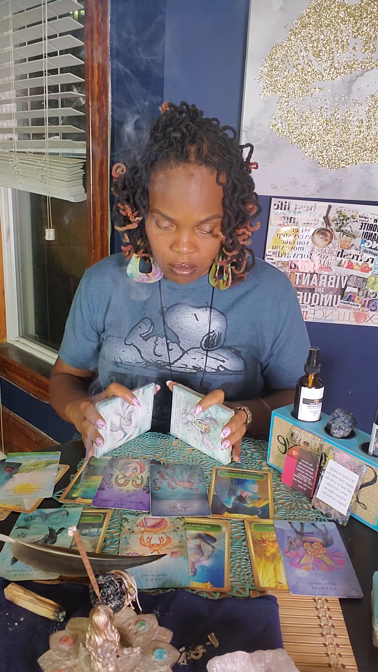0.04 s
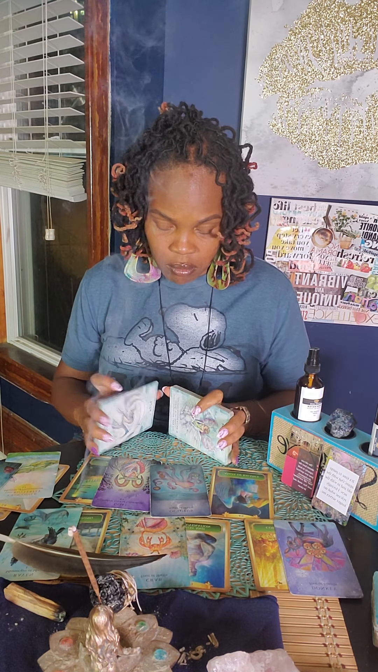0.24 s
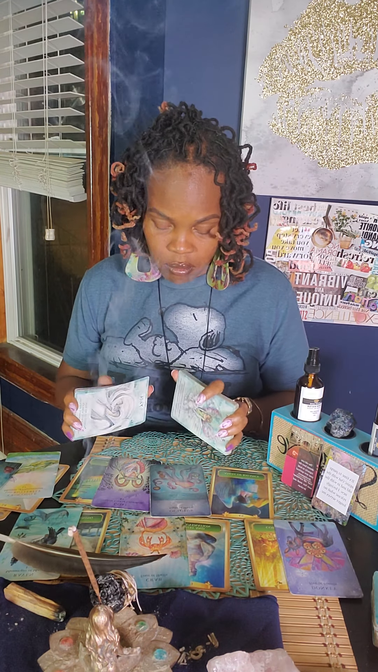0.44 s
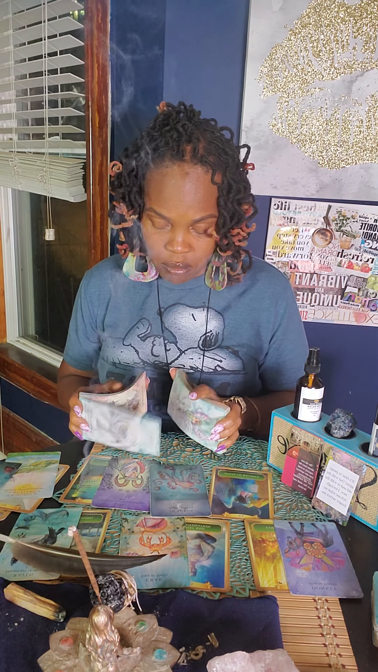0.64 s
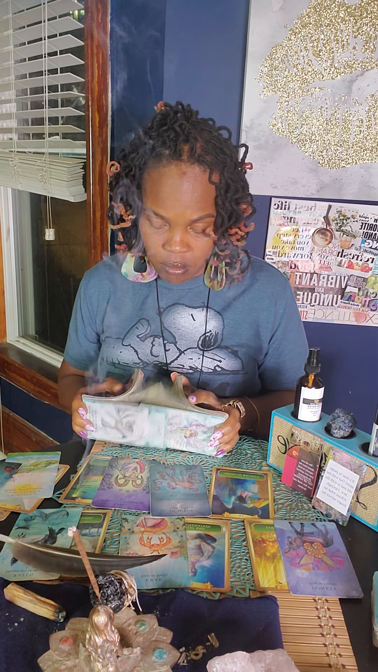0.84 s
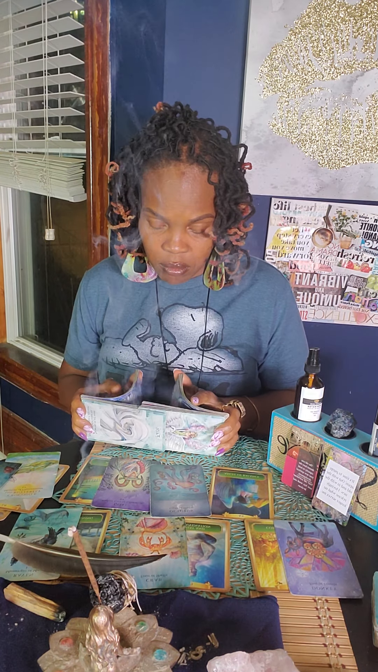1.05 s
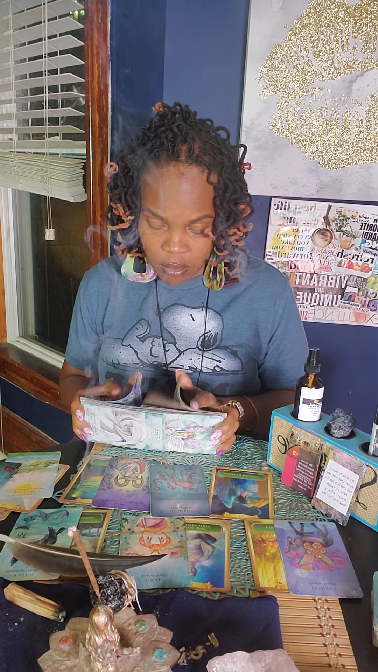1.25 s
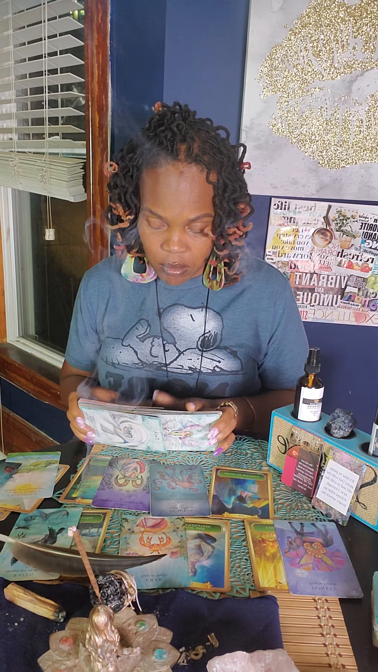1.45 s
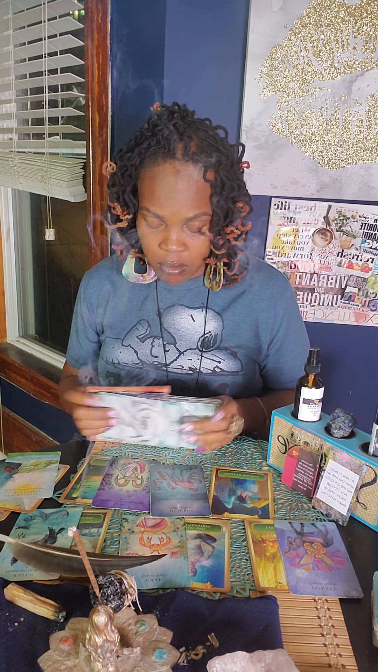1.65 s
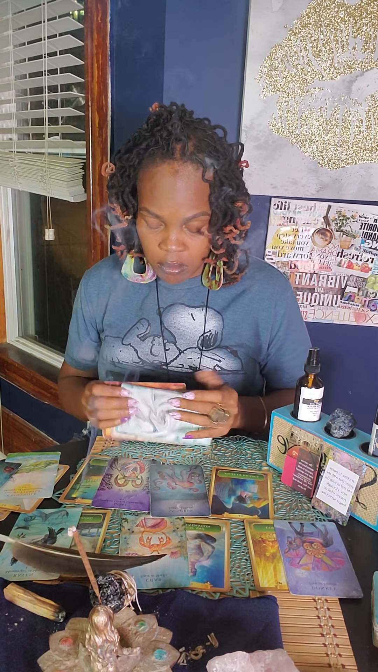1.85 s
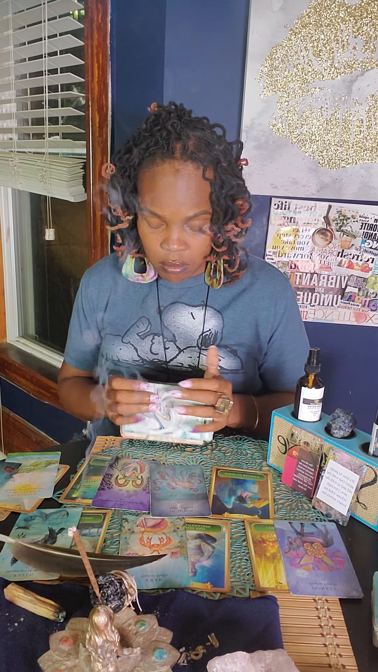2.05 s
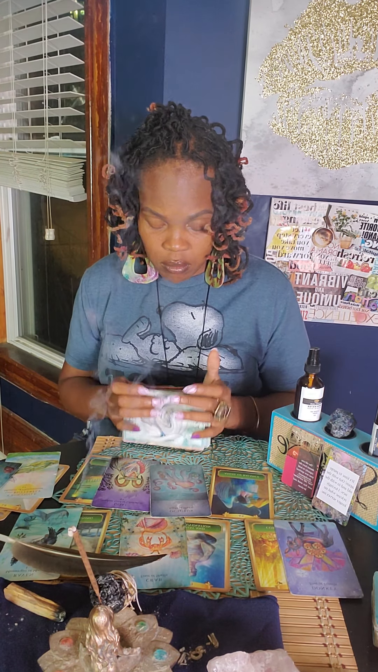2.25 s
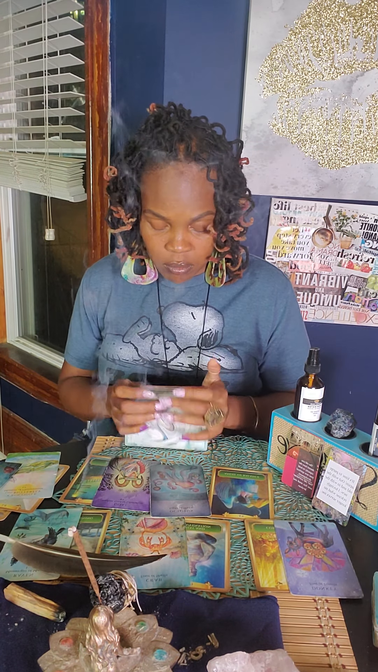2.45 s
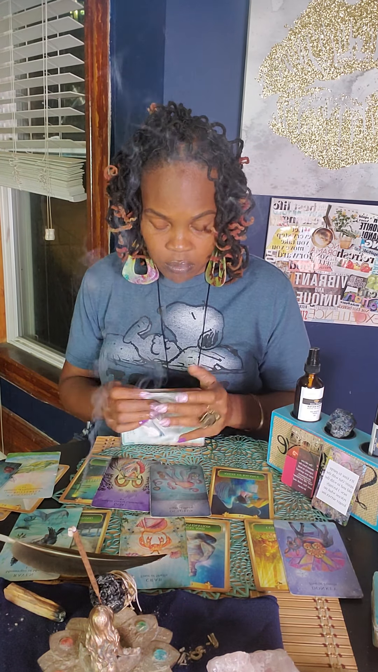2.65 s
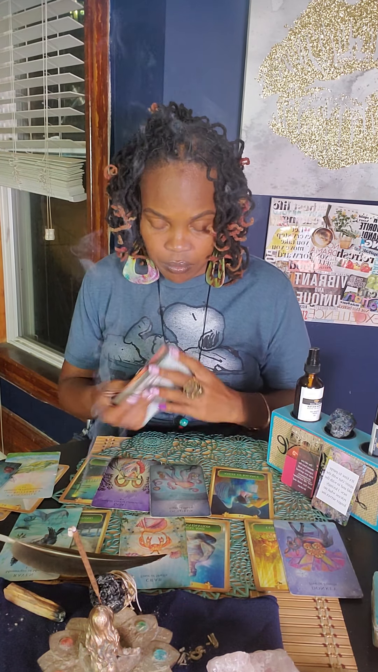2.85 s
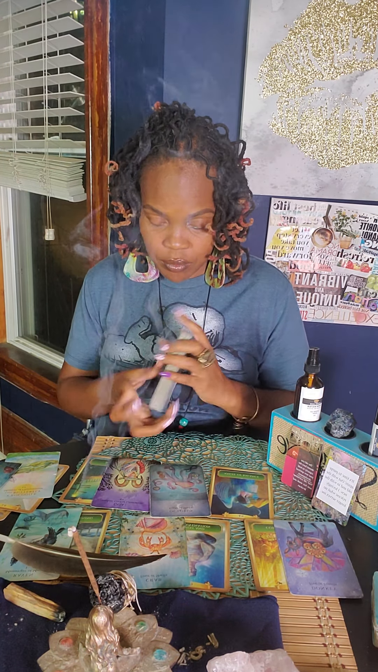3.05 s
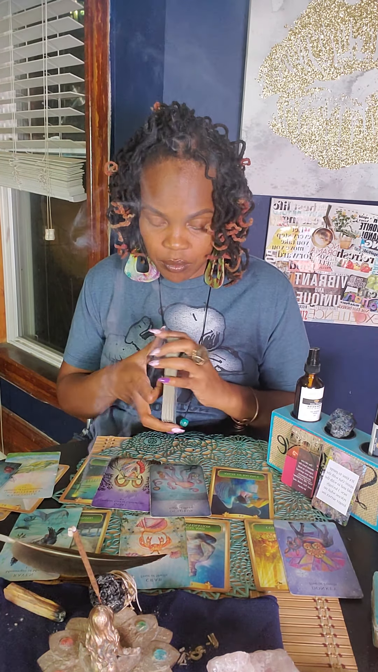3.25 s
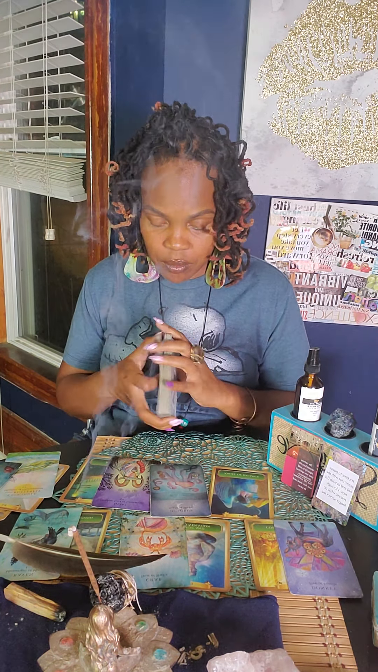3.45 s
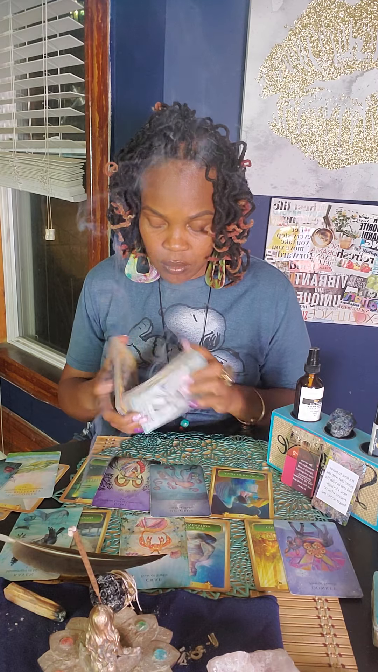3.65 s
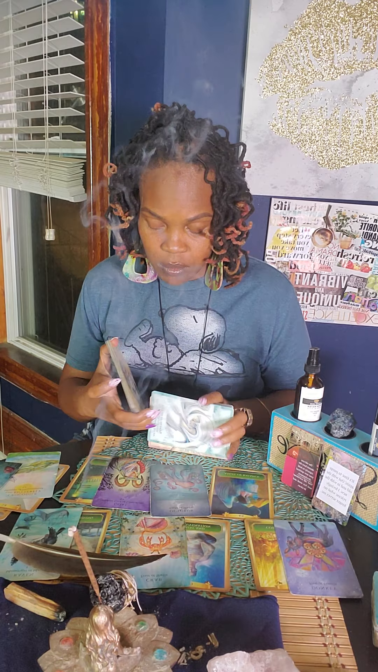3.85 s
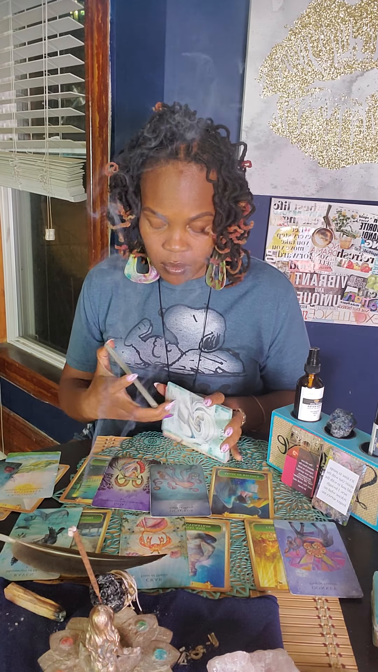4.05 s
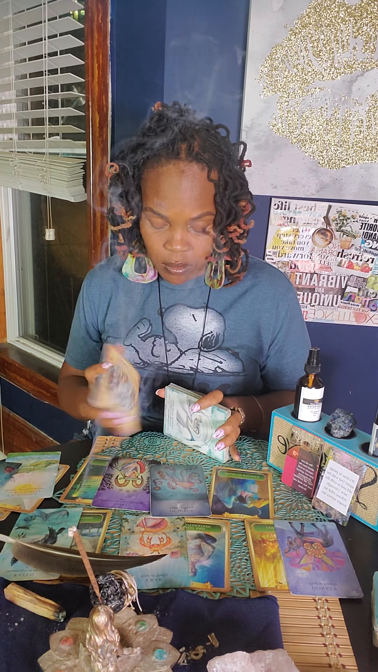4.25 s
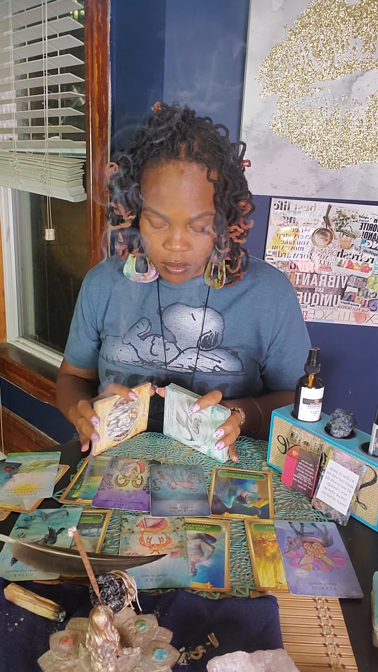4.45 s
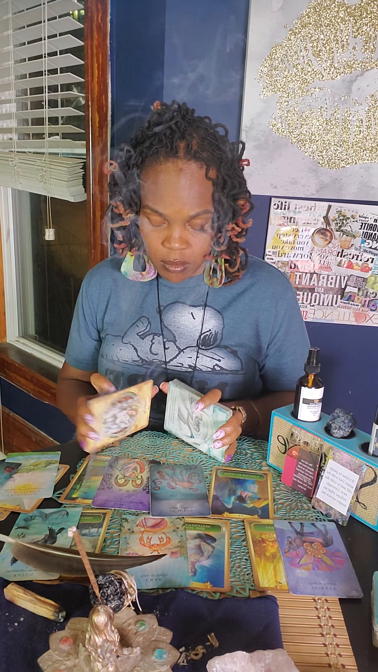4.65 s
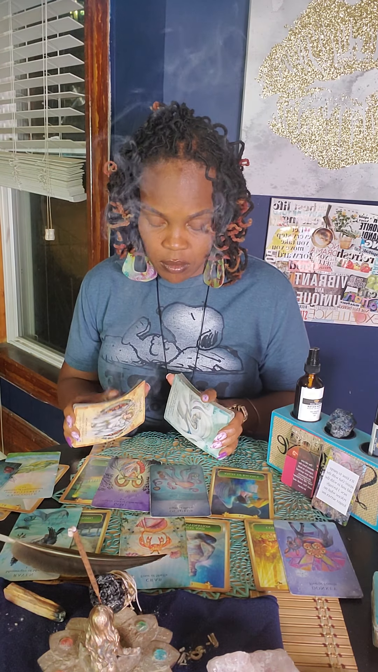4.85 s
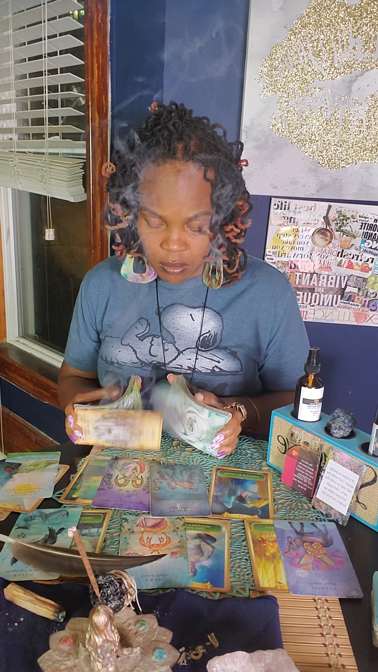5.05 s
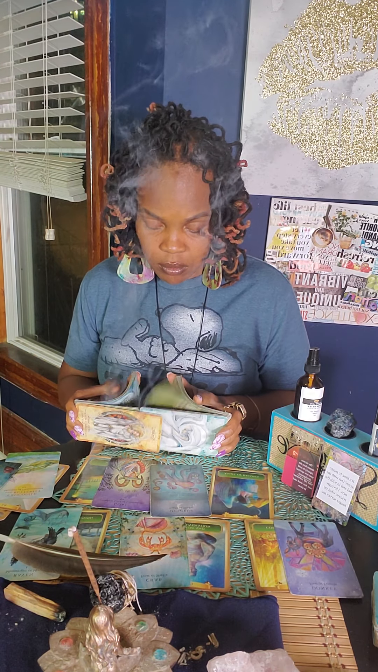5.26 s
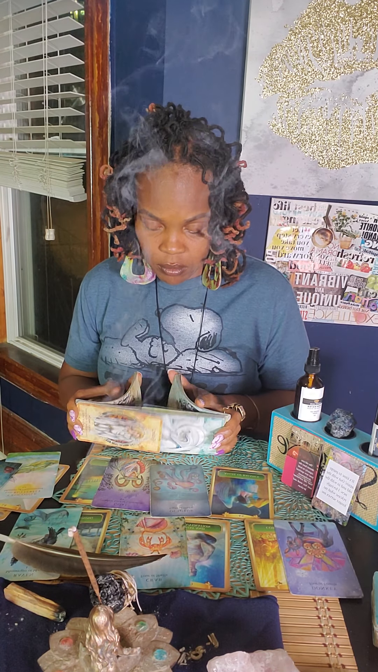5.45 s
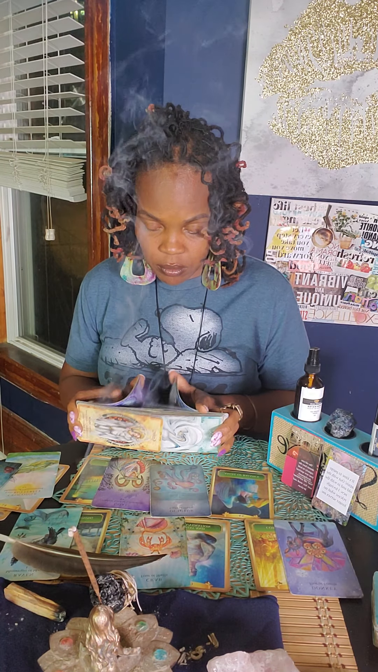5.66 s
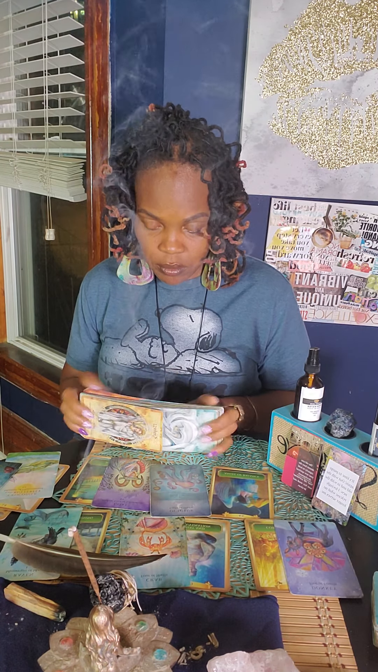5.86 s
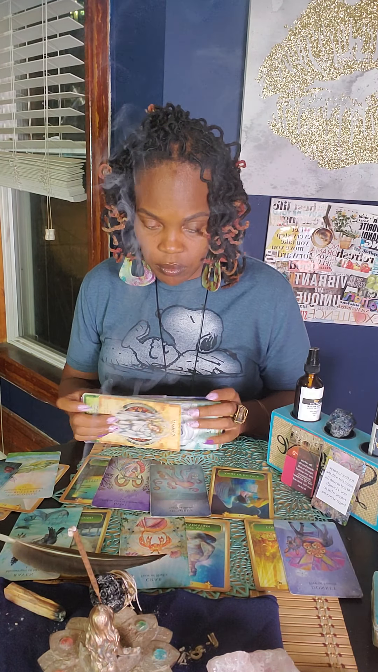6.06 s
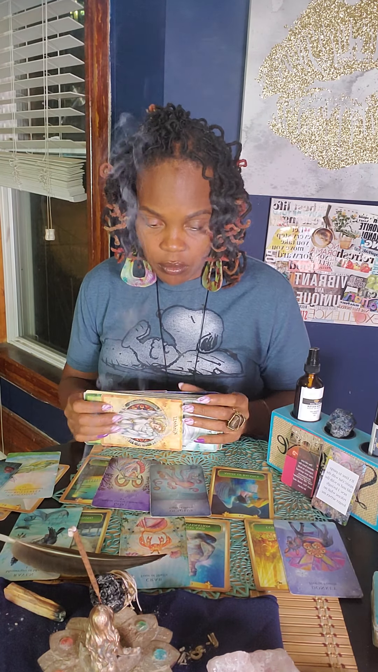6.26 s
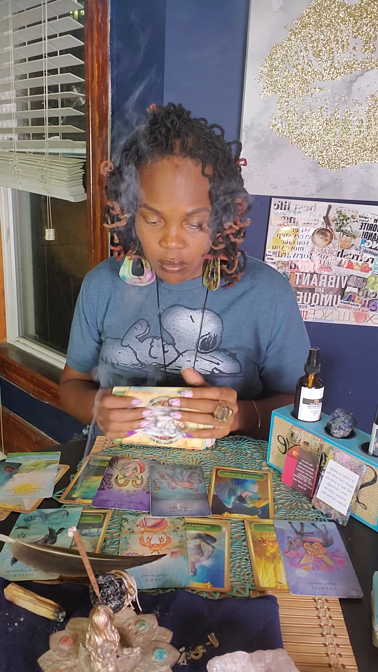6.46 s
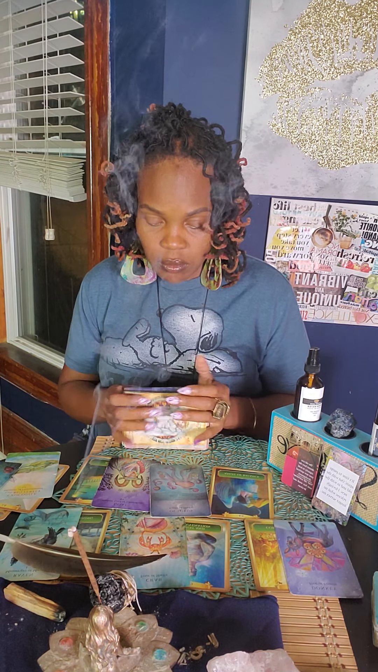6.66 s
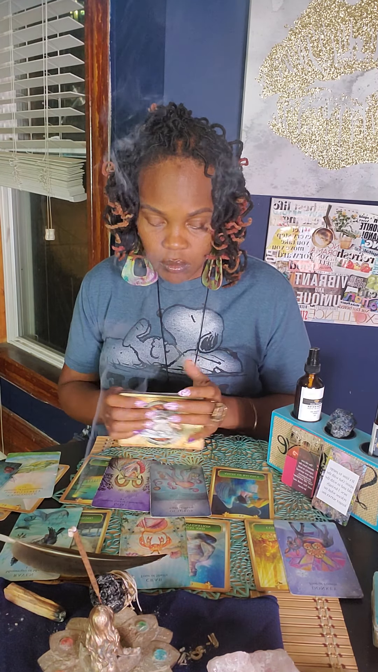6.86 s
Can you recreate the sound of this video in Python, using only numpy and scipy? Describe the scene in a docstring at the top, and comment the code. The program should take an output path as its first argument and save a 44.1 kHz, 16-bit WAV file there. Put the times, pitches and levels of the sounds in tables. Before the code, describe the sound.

Two fluttering riffles of a card deck, each followed by cards hissing together and light knocks on a cloth-covered table.

```python
"""A small, lively room: hands shuffle large stiff cards on a cloth-covered table.
Card edges snap and ring the pack; deck and hands thump the table's low modes. Two riffles flutter
off the thumbs, and card faces hiss as they slide over each other. A low rumble lies underneath.
A phone with two microphone ports hears it all, direct and reflected."""
import sys
import numpy as np
from scipy import signal
from scipy.fft import rfft, irfft, next_fast_len
from scipy.io import wavfile
from scipy.ndimage import uniform_filter1d

SR = 44100
rng = np.random.default_rng(int(sys.argv[2]) if len(sys.argv) > 2 else 0)


def pcm_store(signal):
    """Save signal as 16-bit PCM."""
    levels = np.round(np.clip(np.atleast_2d(signal), -1, 1) * 32767)
    wavfile.write(sys.argv[1], SR, levels.astype(np.int16).T)


N = 304731
LEAD = round(.1 * SR)  # samples ahead of time zero

# table-top modes: (frequency [Hz], width [Hz], level [dB])
TABLE_MODES = [(72.7, 47, 4.5), (99, 15, -4.5), (117.8, 4, 0.5), (169.5, 4.6, 0), (215.7, 51, -7.5),
               (496.7, 310, -26.5)]


def amp(db):
    """dB to gain."""
    return 10 ** (np.asarray(db) / 20)


def unit_rms(x):
    """Scale to rms 1."""
    return x / np.sqrt(np.mean(x ** 2) + 1e-20)


def at_level(x, db):
    """Scale to the energy of 2 ms at level db."""
    return amp(db) * x * np.sqrt(.002 * SR / np.mean(np.sum(x ** 2, -1)))


def curve_at(points, hz):
    """Interpolate over log frequency."""
    points_hz, values = np.transpose(points)
    return np.interp(np.log(hz + 1), np.log(points_hz + 1), values)


def add(mix, time_s, sound):
    """Add a sound to a mix that starts LEAD samples early."""
    part = mix[..., LEAD + round(time_s * SR):][..., :sound.shape[-1]]
    part += sound[..., :part.shape[-1]]


def ring(x, hz, width_hz):
    """Two-pole resonance, peak gain 1."""
    return signal.lfilter(*signal.iirpeak(hz, hz / width_hz, SR), x)


def colour(x, gain_db):
    """Filter by a dB function of frequency."""
    size = next_fast_len(x.shape[-1] + 2048)
    gain = amp(gain_db(np.fft.rfftfreq(size, 1 / SR)))
    return irfft(rfft(x, size) * gain, size)[..., :x.shape[-1]]


def port_pair(spectra, hz):
    """Mix two independent spectra into left and right: alike in the bass, unlike in the treble."""
    # likeness of the ports: (frequency [Hz], correlation [0..1])
    likeness = [(60, 0.91), (200, 0.83), (400, 0.68), (800, 0.24), (1500, 0.11), (4000, 0.087),
                (12000, 0.074)]
    same = np.clip(curve_at(likeness, hz), 0, 1)[:, None]
    return np.array([spectra[0], same * spectra[0] + np.sqrt(1 - same ** 2) * spectra[1]])


def edge_scrape(t60_s):
    """A card edge scrapes: a short stereo noise burst of even spectrum."""
    t = np.arange(2048) / SR
    fade = amp(-60 * t / t60_s) * np.minimum(t / 0.0011, 1)
    noise = rng.standard_normal((2, len(t)))
    for _ in range(3):  # flatten chance peaks, keep the burst short
        spectra = rfft(noise * fade)
        spectra /= np.sqrt(uniform_filter1d(abs(spectra) ** 2, size=3, axis=-1) + 1e-30)
        noise = irfft(spectra) / np.sqrt(fade + 1e-6)
    hz = np.fft.rfftfreq(len(t), 1 / SR)
    pair = port_pair(spectra[..., None], hz / 3)[..., 0]  # ports stay alike 3 times as high
    return irfft(pair) * amp(-60 * t / .06)


def card_snaps():
    """A snapping edge ticks and rings the pack and the bent card. Rows: left, right, room send."""
    # (time [s], tick [dB], pack [dB], card ring [Hz], card ring [dB], width / pitch, left-right [dB])
    snaps = [ (-0.046, -22, -15.5, 700, -37.5, 1.26, 12), (0.6295, -62.5, -58.5, 694, -63, 0.27, -3),
             (0.6701, -45.5, -47.5, 1300, -58, 0.14, -1), (0.7257, -49, -43, 930, -65, 0.41, 1),
             (0.7574, -63.5, -60, 1480, -60, 0.83, -3), (0.7856, -46, -52, 1260, -60, .8, -2),
             (0.7966, -19.5, -24.5, 1230, -31, 0.92, 0.5), (0.8362, -18, -30.5, 1120, -38, 0.48, 1.5),
             (0.846, -34, -43, 2660, -60, 0.44, -4), (0.880, -29, -40, 2000, -28, 0.057, 17),
             (0.8872, -48, -17.5, 2820, -18.5, 0.76, 0), (0.8891, -13.5, -26.5, 2135, -12, 0.2, 2.5),
             (0.8978, -43, -52, 1920, -15.5, 0.42, 7), (1.067, -27.5, -36, 2110, -41, .5, -3),
             (1.098, -42, -57, 2060, -29, 0.23, 0), (1.1061, -21, -27.5, 1110, -24.5, 0.71, -4.5),
             (1.1559, -25, -47, 840, -40, 0.45, -4), (1.2583, -27, -31.5, 1000, -31, 1.4, -2),
             (1.271, -22.5, -40, 820, -48, 0.56, 0.5), (1.3283, -53, -57, 1150, -54, .6, -21),
             (1.3431, -29, -35.5, 1580, -37.5, 0.45, -2), (1.3953, -7, -31, 1087, -22, 1.23, -2),
             (1.8806, -39, -53.5, 1420, -49.5, 1.2, -1), (2.1444, -44, -39, 1490, -41.5, 0.41, -2),
             (2.3571, -55, -58, 1320, -48.5, 1, 4), (2.5678, -55, -61, 11400, -45.5, 0.38, 10),
             (2.5686, -71, -67.5, 1265, -51.5, 0.98, -6), (2.734, -74.5, -74, 3560, -65, .08, 9.5),
             (2.734, -59.5, -50, 2550, -61.5, .12, 6.5), (2.733, -75.5, -79.5, 1520, -66.5, 0.14, 2.5),
             (2.9542, -62.5, -80, 2407, -72, 0.19, 5.5), (3.323, -59.5, -76.5, 2740, -69, 0.054, 7),
             (3.3247, -76, -74.5, 627, -67.5, 0.14, 8), (3.327, -76.5, -80, 5950, -74, 0.028, 2),
             (3.6088, -66, -78.5, 12070, -62, 0.51, 2.5), (3.6203, -57.5, -79.5, 12200, -47, 0.56, -1.5),
             (3.8112, -47, -54, 1074, -47, 1.44, 3), (3.855, -47, -40.5, 1460, -49, 0.27, 6),
             (4.4171, -41, -43, 4830, -43.5, 0.14, 5), (4.421, -23, -36.5, 690, -26.5, 0.15, -4.5),
             (4.4222, -48, -38.5, 550, -27.5, 0.3, 3), (4.427, -32, -49.5, 1680, -41, 0.68, -3),
             (4.7626, -54.5, -67, 3420, -80, 1.03, 5), (5.055, -53.5, -49.5, 1084, -63, 0.83, -1.5),
             (5.076, -42, -41.5, 1040, -42, 0.41, -2), (5.084, -48.5, -38, 1290, -45, 0.4, -5),
             (5.1316, -37, -32.5, 1400, -50, 0.56, -4), (5.1387, -25.5, -45, 1240, -36.5, 0.44, -3),
             (5.1594, -28, -36, 1240, -44.5, 0.73, 0), (5.239, -33.5, -34.5, 1990, -37, 0.72, -1),
             (5.259, -30, -37.5, 1140, -40, 0.7, -1), (5.2891, -32.5, -39, 1920, -56, 0.52, -3),
             (5.3234, -31.5, -36, 1100, -55, 0.68, -6), (5.3633, -22, -26.5, 1140, -25.5, 0.64, 1.5),
             (5.3748, -31, -48, 1440, -66, 0.6, -1), (5.451, -58, -38, 990, -45, 1.7, -2),
             (5.4702, -27.5, -32, 1580, -33, 1.5, 0.5), (5.4897, -32.5, -41, 1020, -39, 0.42, 6),
             (5.5703, -35, -38, 2460, -47.5, 1.1, -3), (5.59, -33, -32.5, 1200, -40.5, 0.94, -6),
             (5.63, -19.5, -36, 1910, -37.5, 0.64, -2), (5.682, -46, -54, 1090, -42.5, 0.49, 1),
             (5.716, -27, -56, 1740, -40.5, 0.56, -8), (5.737, -42, -30, 1640, -30, 0.4, -3),
             (5.7692, -22.5, -43, 2670, -31.5, 0.68, -1), (5.7762, -44, -25.5, 2900, -32.5, 0.97, 4),
             (5.788, -33, -37, 1480, -30.5, 0.79, 22.5), (5.9972, -56.5, -53.5, 3340, -63.5, 0.54, 2),
             (6.0538, -54.5, -79.5, 3010, -83, 1.15, 5.5), (6.7002, -62, -45.5, 1430, -54.5, 1.3, -0.5),
             (6.8483, -60, -50.5, 10900, -59, 0.65, -2), (6.8757, -67, -71.5, 1460, -55.5, 0.98, 10)]
    # tick spectrum: (frequency [Hz], gain [dB])
    tick_spectrum = [(400, -31.5), (1500, -9), (3000, -6), (6000, -12), (10000, -8), (16500, -1)]
    pack_hz, pack_width_hz = 492, 580
    out = np.zeros((3, LEAD + N))
    for time_s, tick_db, pack_db, card_hz, card_db, damping, pan_db in snaps:
        scrape = np.pad(edge_scrape(t60_s=0.018), ((0, 0), (0, 6000)))
        card_width_hz = np.clip(damping, .02, 1.6) * card_hz
        sound = at_level(colour(scrape, lambda hz: curve_at(tick_spectrum, hz)), tick_db)
        for hz, width_hz, db in ((pack_hz, pack_width_hz, pack_db), (card_hz, card_width_hz, card_db)):
            sound += at_level(ring(ring(scrape, hz, width_hz), hz, width_hz), db)
        add(out, time_s, sound[[0, 1, 0]] * amp([[pan_db / 2], [-pan_db / 2], [0]]))
    return out


def table_top(force):
    """The table top rings in its low modes."""
    return sum(amp(db) * ring(force, hz, width_hz) for hz, width_hz, db in TABLE_MODES)


def table_thumps():
    """Deck and hands press on the table: its modes sound, then ring out; the cloth adds a dull rub."""
    # (time [s], blow [dB], contact [s], tilt over 70-180 Hz [dB/octave])
    blows = [(-0.015, -40, 0.061, 4), (0.668, -55.5, 0.071, -1), (0.81, -36, 0.068, -6.5),
             (0.933, -41, 0.17, 1.5), (1.1, -38, 0.037, 4), (1.25, -39, 0.026, -0.5),
             (1.289, -42.5, 0.084, -6.5), (1.397, -34.5, 0.074, 4), (1.884, -36.5, 0.075, 3),
             (2.14, -37.5, 0.06, 2), (2.324, -43.5, 0.1, 4.5), (2.614, -43, 0.039, 3.5),
             (2.738, -51.5, 0.028, 2.5), (3.811, -34, 0.091, 1.5), (4.421, -36, 0.085, 12),
             (5.125, -44.5, 0.049, 2.5), (5.257, -38, 0.043, -6.5), (5.361, -41.5, 0.034, 4.5),
             (5.462, -37, 0.054, -0.5), (5.579, -42.5, 0.061, 1.5), (5.765, -29.5, 0.017, 17.5),
             (6.059, -54, 0.044, 2.5), (6.524, -37, 0.071, -0.5), (6.7, -41.5, 0.042, 3),
             (6.733, -39.5, 0.05, 12)]
    lowpass = signal.butter(2, 330, fs=SR, output="sos")
    out = np.zeros(LEAD + N)
    t = np.arange(round(.3 * SR)) / SR
    for time_s, blow_db, contact_s, tilt_db_oct in blows:
        press = np.minimum(t / (.08 * contact_s), 1) * np.exp(-(t / contact_s) ** 2)
        draws = rng.random((len(TABLE_MODES), 2))
        rub = 0.81 * unit_rms(table_top(rng.standard_normal(len(t)) * press))
        modes = 0
        for (hz, width_hz, db), (detune, phase) in zip(TABLE_MODES[:-1], draws):
            ring_out = .5 * np.minimum(t / 0.019, 1) * np.exp(-np.pi * width_hz * t)
            cycles = hz * (.97 + 0.041 * detune) * t + phase
            modes += amp(db) * (press + ring_out) * np.sin(2 * np.pi * cycles)
        sound = signal.sosfilt(lowpass, rub + unit_rms(modes))
        sound = colour(sound, lambda hz: tilt_db_oct * np.log2(np.clip(hz, 70, 180) / 120))
        add(out, time_s, amp(blow_db) * sound / np.sqrt(np.sum(sound ** 2) / np.sum(press ** 2)))
    return out


def patchy_noise(spectrum, patch_db):
    """Stereo noise, rms 1, whose level wavers in patches of time and frequency."""
    frames, hz = N // 512 + 5, np.fft.rfftfreq(2048, 1 / SR)
    re_a, im_a, re_b, im_b, patches = rng.standard_normal((frames, 1025, 5)).T
    patches = unit_rms(uniform_filter1d(uniform_filter1d(patches, 8, 0), 8, 1))
    spectra = port_pair([re_a + 1j * im_a, re_b + 1j * im_b], hz)
    spectra *= amp(curve_at(spectrum, hz)[:, None] + patch_db * patches)
    return unit_rms(signal.istft(spectra, nperseg=2048, noverlap=1536)[1][:, :N])


def low_rumble():
    """A low rumble swells and fades with the handling, under a faint hiss."""
    # rumble envelope: (time [s], level [dB])
    swell = [(0.0, -64.5), (0.4, -63), (0.73, -62.5), (0.98, -48.5), (1.29, -54), (1.52, -50.5),
             (1.96, -61.5), (2.269, -55), (3.269, -67), (3.92, -57), (5.04, -63.5), (5.29, -58),
             (5.66, -54), (6.1, -61), (6.48, -64.5), (6.721, -57.5), (6.91, -58.5)]
    # rumble: (frequency [Hz], density [dB])
    rumble_spectrum = [(21, -29.5), (35, 5.5), (129, -3.5), (178, -25), (216, -12), (250, -17.5),
                       (320, -46), (550, -120)]
    # faint hiss: (frequency [Hz], density [dB])
    hiss_spectrum = [(120, -23), (200, -5.5), (300, -12), (500, -19.5), (1050, -24.5), (3600, -31),
                     (7000, -41), (8200, -35.5), (12000, -30.5), (15700, -35), (15950, -55)]
    swell_db = np.interp(np.arange(N) / SR, *np.transpose(swell))
    rumble = amp(swell_db) * patchy_noise(rumble_spectrum, patch_db=4.5)
    return rumble + amp(-76.5) * patchy_noise(hiss_spectrum, patch_db=-1.0)


def riffles():
    """Card corners slip off the thumbs in dense, uneven clicks; the table trembles under them."""
    # one envelope per riffle: (time [s], flutter [dB], table tremble [dB])
    envelopes = [
        [(0.62, -76, -77), (0.69, -101, -62), (0.964, -75, -42), (0.998, -44, -39), (1.172, -84, -57.5),
         (1.406, -40, -50), (1.45, -19, -44)],
        [(5.04, -79.5, -69), (5.122, -95, -53.5), (5.236, -67, -50), (5.276, -73.5, -49.5), (5.656, -60, -61),
         (5.74, -39.5, -36), (5.788, -32, -74), (5.86, -100, -78)],
    ]
    # flutter: (frequency [Hz], density [dB])
    flutter_spectrum = [(200, -29), (500, -9.5), (1000, -1), (2000, -1), (4000, -8), (7000, -6.5),
                        (11000, -2.5), (16500, -5)]
    clicks_per_s = 600
    out = np.zeros(LEAD + N)
    for envelope in envelopes:
        times_s, *levels_db = np.transpose(envelope)
        t = np.arange(times_s[0], times_s[-1], 1 / SR)
        flutter_db, tremble_db = (np.interp(t, times_s, db) for db in levels_db)
        size_draw, sign_draw, slip_draw = rng.random((3, len(t)))
        sizes = amp(4.5 * np.minimum(-np.log(size_draw + 1e-9), 3)) * np.sign(sign_draw - .5)
        clicks = unit_rms(sizes * (slip_draw < clicks_per_s / SR))
        rustle = .5 * rng.standard_normal(len(t))
        flutter = unit_rms(colour(clicks + rustle, lambda hz: curve_at(flutter_spectrum, hz)))
        tremble = unit_rms(table_top(rng.standard_normal(len(t))))
        sound = amp(flutter_db) * flutter + amp(tremble_db) * tremble
        add(out, times_s[0], sound * signal.windows.tukey(len(t), .03))
    return out


def card_slides():
    """Card faces rub: friction hiss in two bands swells and dies with each slide."""
    # (peak time [s], level [dB], rise [s], fall [s], high-band boost and low-band cut [dB])
    slides = [ (1.69, -52, 0.046, 0.25, 3), (1.752, -47, 0.068, 0.12, -2.5),
              (1.881, -51.5, 0.011, 0.088, -3.5), (1.957, -46, 0.068, 0.057, -0.5),
              (2.143, -41, 0.017, 0.075, -3), (2.35, -50, 0.076, 0.068, -1.5), (2.44, -61.5, 0.1, 0.14, -1),
              (2.574, -52, 0.042, 0.16, -1.5), (2.732, -63, 0.027, 0.16, 1.5), (2.88, -75, 0.19, 0.18, 3.5),
              (3.03, -71, 0.25, .1, 5), (3.336, -72.5, 0.15, 0.19, 5.5), (3.628, -63, 0.011, 0.15, 9),
              (3.687, -50, 0.018, 0.081, 3), (3.812, -55.5, 0.017, 0.073, -2),
              (3.856, -49, 0.033, 0.064, -2.5), (4.225, -71, 0.071, 0.1, 4), (4.77, -65, 0.021, 0.096, 8),
              (6.41, -56.5, 0.098, 0.051, 10.5), (6.498, -63.5, 0.11, 0.24, 1.5),
              (6.598, -50.5, 0.11, 0.03, 1.5), (6.737, -47, 0.057, 0.03, -3.5),
              (6.885, -55.5, 0.065, 0.51, -0.5)]
    # friction hiss: (frequency [Hz], density [dB])
    friction_spectrum = [(900, -7), (1400, -3.5), (2000, -7.5), (3500, -8.5), (6000, -16.5), (8500, -6),
                         (12000, 0.5), (15700, 7.5), (15950, -20.5)]
    range_db, roundness = 30, 1.4  # depth of rise and fall; over 1 rounds the peak
    t = np.arange(-LEAD, N) / SR
    hiss = unit_rms(colour(rng.standard_normal(len(t)), lambda hz: curve_at(friction_spectrum, hz)))
    low = signal.sosfilt(signal.butter(2, 5500, fs=SR, output="sos"), hiss)
    power = np.zeros((2, len(t)))
    for peak_s, peak_db, rise_s, fall_s, tilt_db in slides:
        from_peak = np.maximum((peak_s - t) / rise_s, (t - peak_s) / fall_s)
        level_db = peak_db - range_db * from_peak ** roundness
        power += amp([level_db - tilt_db, level_db + tilt_db]) ** 2
    return np.sqrt(power[0]) * low + np.sqrt(power[1]) * (hiss - low)


def near_echoes(x):
    """The nearest hard surfaces throw sharp sounds back."""
    # (delay [s], gain [dB])
    echoes = [(0.009, -11), (0.0219, -17.5), (0.032, -15)]
    return sum(amp(db) * np.roll(x, round(delay_s * SR), axis=1) for delay_s, db in echoes)


def room(x):
    """Sparse reflections die band by band; three tails crossfade steadily to avoid ringing tones."""
    # room decay: (frequency [Hz], t60 [s])
    decay = [(60, 0.16), (160, 0.23), (420, 0.32), (1100, .38), (2900, 0.4), (7700, 0.35), (16000, 0.31)]
    crossfade_hz, spread_db = 3.3, 5
    first, step, length = 120, 20, SR // 2  # samples
    turn = 2 * np.pi * crossfade_hz * np.arange(len(x)) / SR
    out = 0
    for k in range(3):
        slots = np.arange(first, length - step, step)
        arrivals = slots + rng.integers(0, step, (2, len(slots)))
        sizes = rng.choice([-1., 1.], arrivals.shape) * amp(spread_db * rng.standard_normal(len(slots)))
        taps = np.zeros((2, length))
        np.put_along_axis(taps, arrivals, sizes, 1)
        hz, t, spectra = signal.stft(taps, SR, nperseg=512)
        fade = amp(-60 * t / curve_at(decay, hz)[:, None])
        tail = signal.istft(port_pair(spectra, hz) * fade, SR, nperseg=512)[1]
        tail[:, :first] = 0  # nothing returns before the nearest surface
        tail /= np.linalg.norm(tail[0])
        share = np.sqrt(2 / 3) * np.cos(turn + k * np.pi / 3)
        out += signal.fftconvolve((share * x)[None], tail, axes=1)[:, :len(x)]
    return out


def scene():
    """Cards and table, direct and reflected, coloured by the microphone, over the rumble."""
    # share of snaps and riffles reaching the walls: (frequency [Hz], gain [dB])
    carry = [(250, -3), (600, -3), (1300, -2.5), (2500, -1), (8000, -2), (14000, 0.5), (15700, -0.5),
             (16000, -14)]
    # microphone response: (frequency [Hz], gain [dB])
    mic_response = [(60, -3), (4500, 1), (6200, -1), (7200, -10.5), (7900, 0.5), (10500, -1),
                    (15000, -16.5)]
    sharp = card_snaps() + riffles()
    thumps, slides = table_thumps(), card_slides()
    direct = sharp[:2] + thumps + slides
    carried = colour(sharp[2], lambda hz: curve_at(carry, hz))
    room_send = amp(1.5) * carried + amp(-1.5) * thumps + amp(-4) * slides
    heard = direct + near_echoes(sharp[:2]) + room(room_send)
    return colour(heard, lambda hz: curve_at(mic_response, hz))[:, LEAD:] + low_rumble()


def record(dry):
    """The phone's ports differ in gain by frequency, the left 2 samples late; both are band-limited."""
    # port imbalance: (frequency [Hz], left-right [dB])
    imbalance = [(60, -3), (200, -2.5), (500, 0), (2000, 3.5), (5000, 9), (12000, 5.5)]
    low_cut_hz, high_cut_hz = 40, 16300
    left, right = colour(dry, lambda hz: curve_at(imbalance, hz) * np.array([[.5], [-.5]]))
    ports = np.array([np.roll(left, 2), right])
    ports = signal.sosfilt(signal.butter(4, low_cut_hz, "high", fs=SR, output="sos"), ports)
    lowpass = signal.firwin(127, high_cut_hz, window=("kaiser", 9), fs=SR)
    return signal.oaconvolve(ports, lowpass[None], "same")


dry = scene()
out = record(dry)
pcm_store(out)
```